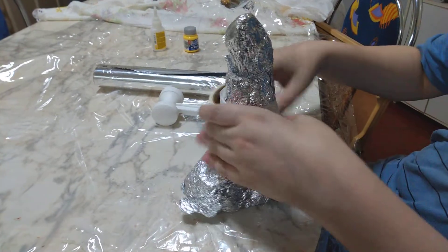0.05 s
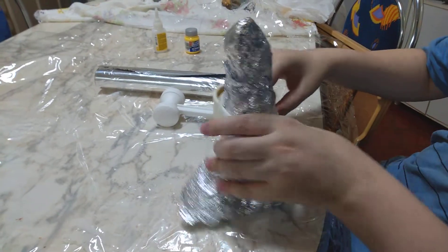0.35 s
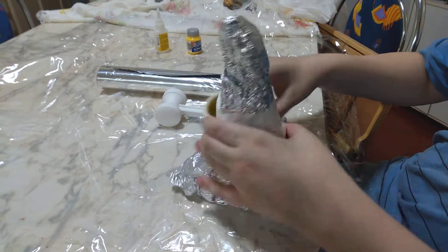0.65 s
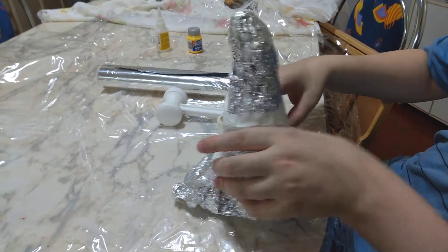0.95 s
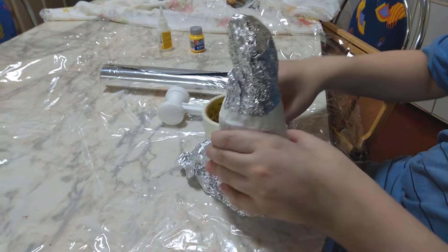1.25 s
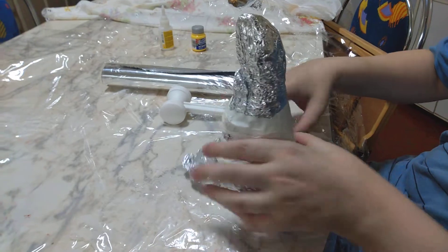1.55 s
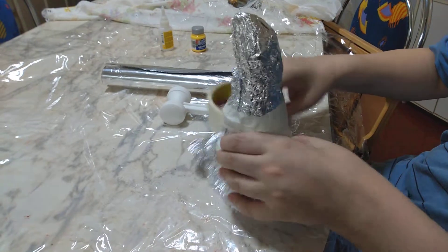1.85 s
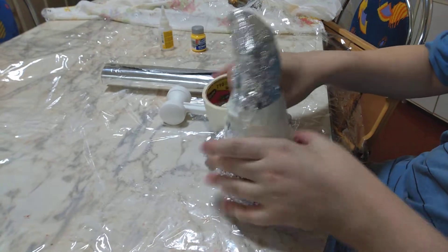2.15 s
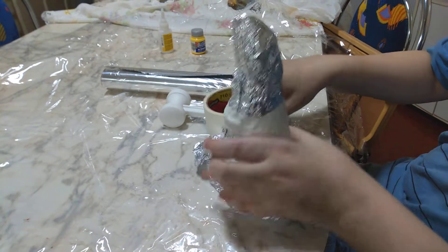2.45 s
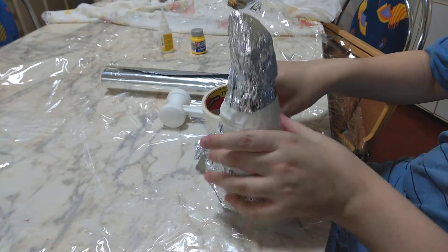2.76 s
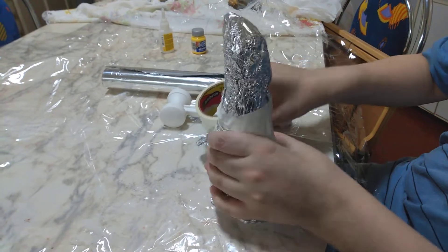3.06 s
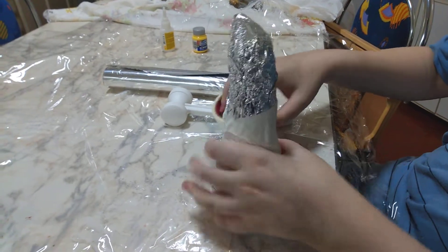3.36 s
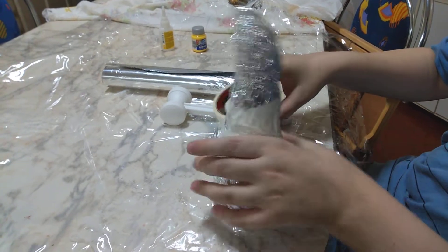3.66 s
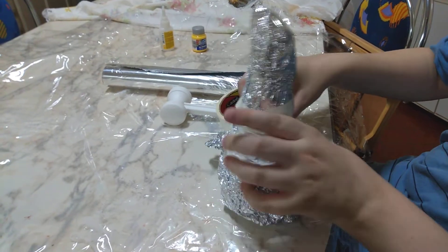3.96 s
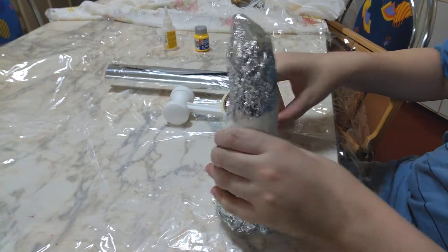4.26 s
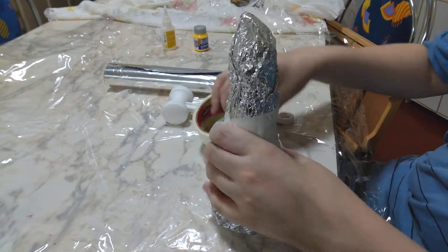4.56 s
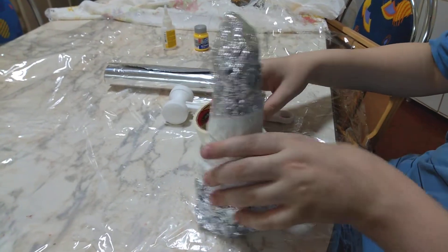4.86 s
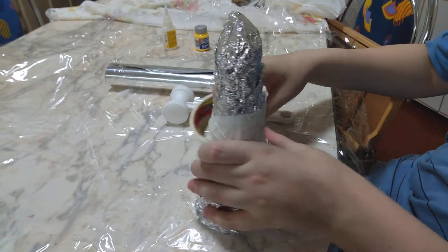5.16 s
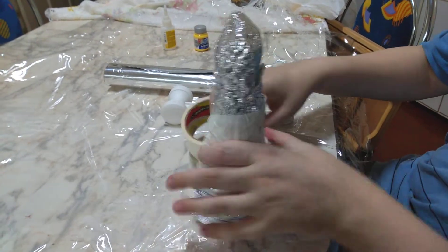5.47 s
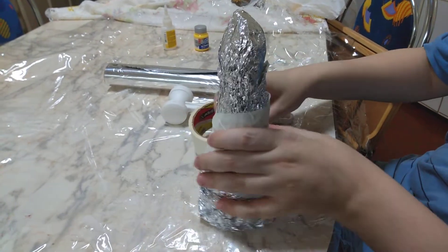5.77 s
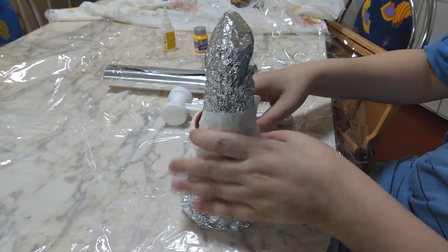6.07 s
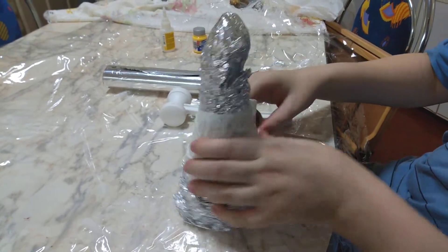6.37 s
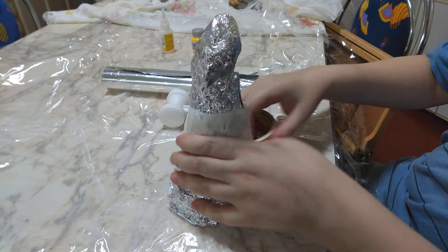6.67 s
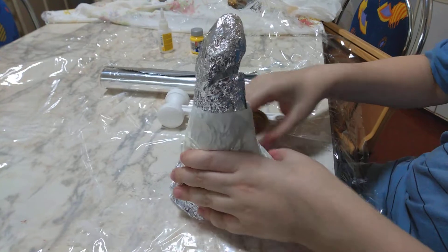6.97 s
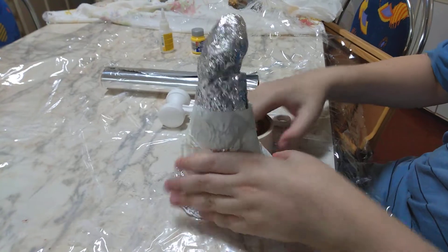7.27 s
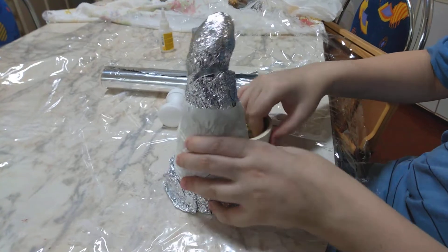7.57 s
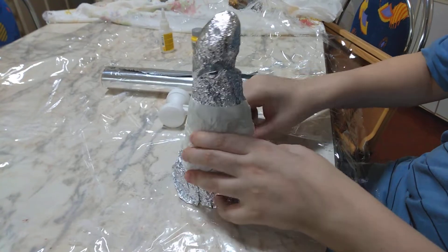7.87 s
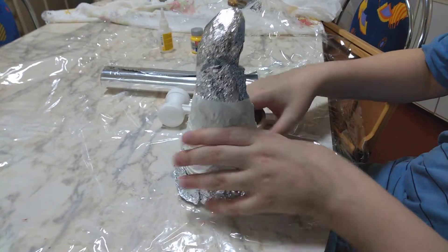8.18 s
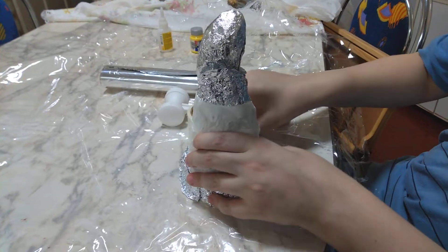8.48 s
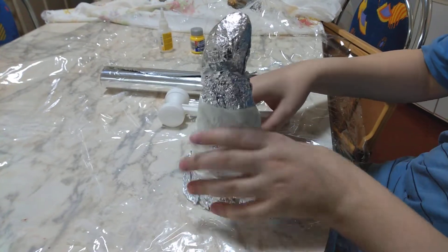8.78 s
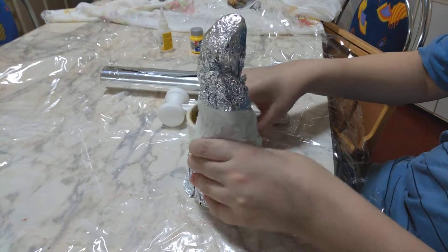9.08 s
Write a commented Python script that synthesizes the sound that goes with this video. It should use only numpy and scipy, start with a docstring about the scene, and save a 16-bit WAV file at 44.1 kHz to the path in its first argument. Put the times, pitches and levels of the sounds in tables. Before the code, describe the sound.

Short, rasping pulls of masking tape alternate with aluminium foil crackling and a few dull table knocks in a bare room.

```python
"""Taping a foil-covered form

A table in a bare room, a stereo microphone above it. Masking tape is tugged off its roll ten times and
wound round the form: the glue lets go in stick-slip jerks that ring the taut strip and the roll, while
its threads fizz. Between tugs fingers press the tape down, the foil buckles and ticks, and the form
bumps the table. The room rings on over a faint hush of air."""
import sys
import numpy as np
from scipy import signal
from scipy.fft import rfft, irfft, next_fast_len
from scipy.io import wavfile
from scipy.ndimage import uniform_filter1d

SR = 44100
rng = np.random.default_rng(int(sys.argv[2]) if len(sys.argv) > 2 else 0)


def master(y):
    """Save y as 16-bit WAV."""
    cut = np.clip(np.atleast_2d(y).T, -1, 1)
    pcm = np.round(cut * 32767)  # scale
    wavfile.write(sys.argv[1], SR, pcm.astype(np.int16))


N = 411451
T = np.arange(N) / SR
PATCH_HOLD_S, HAND_HOLD_S = .006, .012  # how long a patch of material, or a hand pose, shapes the sound


def amp(db):
    """Decibels to gain."""
    return 10 ** (np.asarray(db) / 20)


def along(points, hz):
    """Read (hz, value) points on a log-frequency axis."""
    point_hz, value = np.transpose(points)
    return np.interp(np.log(np.maximum(hz, 1)), np.log(point_hz), value)


def ring(x, response):
    """Pass x through an impulse response."""
    return signal.oaconvolve(x, response)[:N]


def colour(points, size=2048):
    """Causal response of unit energy with the given (hz, db) spectrum."""
    gain = amp(along(points, np.fft.rfftfreq(size, 1 / SR)))
    cepstrum = irfft(np.log(gain))
    cepstrum[1:size // 2] *= 2
    cepstrum[size // 2 + 1:] = 0
    response = irfft(np.exp(rfft(cepstrum)))
    return response / np.linalg.norm(response)


def resonator(modes, skirt_hz, size=1024):
    """Damped modes of unit total energy; neighbours swing in opposite senses, so the ring swells."""
    t = T[:size]
    response = sum((-1) ** k * amp(db) * width * np.exp(-np.pi * width * t) * np.cos(2 * np.pi * hz * t)
                   for k, (hz, width, db) in enumerate(modes))
    # soft tape and padding damp what lies above the modes
    response = signal.sosfilt(signal.butter(2, skirt_hz, fs=SR, output="sos"), response)
    return response / np.linalg.norm(response)


def crackle(per_s, spread_db, even_s):
    """Random snaps of very unequal size, evened towards rms 1 over stretches of even_s."""
    fires = rng.random(N) < per_s / SR
    snaps = fires * amp(spread_db * np.minimum(rng.exponential(size=N), 5)) * rng.choice([-1, 1], N)
    width = int(even_s * SR)
    power = np.abs(uniform_filter1d(uniform_filter1d(snaps ** 2, width), width))
    return snaps / np.sqrt(power + .1 / SR)


def clumps(per_s, spread_db):
    """Gain of mean power 1 that jumps to a new random level about per_s times a second."""
    step = np.cumsum(rng.random(N) < per_s / SR)
    gain = amp(spread_db * np.clip(rng.standard_normal(N), -2, 1.5))[step]
    return gain / np.sqrt(uniform_filter1d(gain ** 2, SR // 25))


def scatter(x, decay_s, hold_s, size=512):
    """Smear x with a short random response that is renewed every hold_s, keeping its energy."""
    hop = int(hold_s * SR)
    frames = np.lib.stride_tricks.sliding_window_view(np.pad(x, (hop, 2 * hop)), 2 * hop)[::hop]
    window = np.sin(np.pi * np.arange(2 * hop) / (2 * hop))
    responses = rng.standard_normal((len(frames), size)) * np.exp(-T[:size] / decay_s)
    responses /= np.linalg.norm(responses, axis=1, keepdims=True)
    out = np.zeros(N + 4 * hop + size)
    for k, piece in enumerate(signal.fftconvolve(frames * window, responses, axes=1)):
        out[k * hop:k * hop + len(piece)] += piece
    return out[hop:hop + N]


def snap(response, after_db, decay_s, size=400):
    """One clean break and the brief run of smaller breaks that it sets off, ringing a response."""
    breaks = rng.standard_normal(size) * np.exp(-T[:size] / decay_s)
    breaks *= amp(after_db) / np.linalg.norm(breaks)
    breaks[0] = 1
    return np.convolve(response, breaks)


def place(events, sound):
    """Place sound(other columns) at each row of start_s, peak_db, other columns."""
    out = np.zeros(N + SR)
    for start_s, peak_db, *rest in events:
        event, start = sound(*rest), max(int(start_s * SR), 0)
        out[start:start + len(event)] += amp(peak_db) * event / np.abs(event).max()
    return out[:N]


def ports(shared, apart, alike_hz):
    """The microphone's two close ports hear the same bass but unrelated treble."""
    hz = np.fft.rfftfreq(len(shared), 1 / SR)
    likeness = 1 / (1 + (hz / alike_hz) ** 2)
    mid = rfft(shared) * np.sqrt((1 + likeness) / 2)
    side = rfft(apart) * np.sqrt((1 - likeness) / 2)
    return irfft(np.array([mid + side, mid - side]), len(shared))


# Room tone at the microphone: frequency_hz, level_db
AIR_SPECTRUM = [(15, -33), (25, -1), (76, 5), (641, -25.5), (962, -7), (1480, -12), (2350, -14),
                (5140, -25.5), (8590, -27.5), (12200, -19), (16000, -20.5)]

def room_air():
    """The steady low hush of the room's air, at rms 1."""
    hush = ring(rng.standard_normal(N), colour(AIR_SPECTRUM))
    return hush / np.sqrt(np.mean(hush ** 2))


def press(length_s, build_share=.2, sag_db_per_s=14.5, release_s=.02):
    """Gain of one finger press: it builds, eases as the foil gives way, and lets go."""
    t = T[:SR // 2]
    build = np.minimum(t / (build_share * length_s), 1)
    release = np.exp(-np.maximum(t - length_s, 0) / release_s)
    return build * amp(-sag_db_per_s * t) * release


# Fingers pressing the tape onto the form: start_s, length_s, crumple_db, sizzle_db
PRESSES = [(0.0, 0.044, -45, -53.5), (0.237, 0.11, -58.5, -61), (0.408, 0.05, -37.5, -50),
           (0.549, 0.068, -39, -40), (0.644, 0.11, -46, -51.5), (0.944, 0.11, -50.5, -61.5),
           (1.052, 0.11, -47.5, -56.5), (1.424, 0.09, -48, -56), (1.542, 0.062, -55.5, -65),
           (1.646, 0.092, -53, -57), (1.712, 0.27, -48.5, -51), (2.06, 0.11, -52, -60),
           (2.347, 0.073, -56.5, -63), (2.425, 0.15, -49, -56.5), (2.62, 0.079, -49.5, -52.5),
           (2.84, 0.15, -56.5, -64), (3.058, 0.13, -44.5, -47), (3.328, 0.045, -52, -66),
           (3.521, 0.2, -59.5, -65.5), (3.887, 0.03, -59, -61), (4.136, 0.2, -54.5, -61),
           (4.248, 0.03, -39.5, -42), (4.328, 0.086, -42, -46.5), (4.522, 0.18, -46.5, -53),
           (4.728, 0.12, -63.5, -64), (4.988, 0.04, -45.5, -55.5), (5.135, 0.16, -45.5, -52.5),
           (5.371, 0.16, -51, -56.5), (5.623, 0.062, -56.5, -64), (5.806, 0.15, -59, -61),
           (6.03, 0.15, -61, -67.5), (6.266, 0.23, -56, -61.5), (6.708, 0.04, -52.5, -57),
           (6.762, 0.03, -44.5, -52.5), (6.855, 0.045, -59, -65), (6.922, 0.032, -43.5, -47),
           (7.078, 0.1, -43.5, -61), (7.219, 0.053, -47.5, -51.5), (7.405, 0.21, -55.5, -65),
           (7.598, 0.35, -41, -50.5), (7.928, 0.11, -48.5, -64.5), (8.228, 0.061, -50, -56.5),
           (8.525, 0.13, -48.5, -55.5), (8.832, 0.12, -49.5, -60.5), (9.233, 0.16, -52, -62)]

def fingers(rest_db=-79):
    """Gains of the shell's crumple and the foil's sizzle; resting fingers still stir both faintly."""
    start_s, length_s, crumple_db, sizzle_db = np.transpose(PRESSES)
    crumple = amp(rest_db) + place(zip(start_s, crumple_db, length_s), press)
    sizzle = amp(rest_db) + place(zip(start_s, sizzle_db, length_s), press)
    return crumple, sizzle


# Tone of the taped foil shell and of a bare crease: frequency_hz, level_db
SHELL_SPECTRUM = [(80, -15), (150, -10), (400, -9), (620, -11.5), (850, 3), (1150, 1.5), (1600, -3.5),
                  (2300, -2.5), (3000, -11), (3800, -9.5), (5000, -24.5), (9000, -24.5), (16000, -38.5)]
CREASE_SPECTRUM = [(1500, -11), (3500, -12.5), (6000, -9.5), (8000, -8), (10000, -5), (12500, 2),
                   (16000, -2.5)]
# The loudest folds snapping through, below the microphone: start_s, shell_db, crease_db
FOLD_SNAPS = [(0.2317, -38, -34.5), (0.2942, -46, -36), (0.356, -31, -28), (0.3733, -23, -26),
              (0.4334, -31, -37), (0.5838, -34, -20), (0.593, -27, -16), (0.613, -24, -33),
              (0.643, -17, -31), (1.053, -27, -32), (1.505, -25, -22.5), (1.7407, -26, -28),
              (2.125, -36.5, -48), (2.1761, -37, -34), (2.363, -33.5, -38), (2.4364, -40, -21.5),
              (2.47, -27.5, -32), (2.5528, -33, -31), (2.6493, -44, -30), (2.779, -46, -40),
              (2.9316, -32.5, -28.5), (3.0925, -44, -23.5), (3.123, -34, -18), (3.139, -37, -19),
              (3.1776, -49, -26), (3.1892, -40, -13.5), (3.601, -40.5, -48), (3.635, -43, -48),
              (3.846, -36, -46), (3.894, -48, -35.5), (4.1469, -36.5, -28), (4.257, -29.5, -32),
              (4.388, -36, -22), (4.579, -30.5, -44), (4.673, -38, -44), (4.692, -31.5, -42),
              (4.828, -36, -39), (5.003, -36.5, -45), (5.0927, -50, -37), (5.429, -37, -48),
              (5.4514, -30.5, -31), (5.547, -37, -46), (5.6304, -59, -35), (5.9416, -51, -42),
              (6.173, -41, -48), (6.3255, -35.5, -34.5), (6.4324, -44, -33.5), (6.563, -51, -38.5),
              (6.708, -38.5, -37), (6.779, -32.5, -42), (7.2495, -42, -26), (7.515, -40, -49),
              (7.567, -31, -28), (7.609, -29.5, -27), (7.651, -29, -24), (7.8044, -29, -7.5),
              (7.9929, -31, -30.5), (8.06, -36.5, -35), (8.266, -30, -51), (8.287, -33.5, -33),
              (8.625, -32.5, -34), (8.668, -27.5, -38), (8.8915, -33.5, -33)]

def foil():
    """Under the fingers the taped shell crumples dully and bare creases tick brightly."""
    crumple, sizzle = fingers()
    shell, crease = colour(SHELL_SPECTRUM), colour(CREASE_SPECTRUM)
    # a light touch gives single snaps; harder pressure buckles so many folds that they merge into a rub
    pressure = np.clip(crumple / amp(-56), .4, 8)
    avalanches = clumps(per_s=150, spread_db=2.5)
    folds = avalanches * crackle(per_s=450 * pressure, spread_db=4.5, even_s=0.011)
    wrinkles = crackle(per_s=120 * pressure, spread_db=8.5, even_s=0.021)
    dull = ring(scatter(folds * crumple, decay_s=0.0011, hold_s=PATCH_HOLD_S), shell)
    bright = ring(sizzle * (amp(-1.5) * folds + amp(1.5) * wrinkles), crease)
    start_s, shell_db, crease_db = np.transpose(FOLD_SNAPS)
    buckles = place(zip(start_s, shell_db), lambda: snap(shell, after_db=0.5, decay_s=.0018))
    ticks = place(zip(start_s, crease_db), lambda: snap(crease, after_db=2.5, decay_s=0.00064))
    return amp(-2.5) * dull + bright + amp(0.5) * buckles + amp(4.5) * ticks


def drag(length_s, rise_s=0.052, settle_s=0.089):
    """Gain of the form sliding under one tug and settling after it."""
    t = T[:SR]
    return np.minimum(t / rise_s, 1) * np.exp(-np.maximum(t - length_s, 0) / settle_s)


# Tone of the table top under the sliding form: frequency_hz, level_db
TABLE_SPECTRUM = [(20, -31), (35, -24.5), (50, 3.5), (70, 0), (110, -2), (200, -7), (320, -16), (700, -21),
                  (2000, -66)]

def table_shuffle(rock_db=-12.5, tremble_db=-66):
    """Tugs drag the form, pressing fingers rock it, and the hands never hold it quite still."""
    start_s, length_s, *_, drag_db = np.transpose(TUGS)
    crumple, _ = fingers()
    motion = place(zip(start_s, drag_db, length_s), drag) + amp(rock_db) * crumple + amp(tremble_db)
    friction = crackle(per_s=300, spread_db=2, even_s=0.053)
    return ring(friction * motion, colour(TABLE_SPECTRUM))


# Form and roll knocking on the table: start_s, level_db, pitch_hz
BUMPS = [(0.019, -42.5, 67.3), (0.358, -49, 234), (1.495, -43, 137), (1.677, -41.5, 89), (1.814, -41, 304),
         (2.351, -44, 137), (3.833, -55, 104), (4.256, -49.5, 398), (4.561, -40.5, 218),
         (5.003, -50.5, 172), (5.249, -44, 227), (5.651, -50.5, 127), (6.305, -50, 91), (6.956, -39.5, 395),
         (7.745, -34.5, 284), (8.232, -43, 119), (8.371, -45, 135), (8.846, -51, 250), (8.984, -42.5, 209)]

def table_bumps(width_hz=32):
    """Each padded blow rings one low mode and a weaker, shorter one above it."""
    def thud(pitch_hz):
        modes = [(pitch_hz, width_hz, 0), (2.5 * pitch_hz, 2 * width_hz, -14)]
        return resonator(modes, skirt_hz=450, size=4096)
    return place(BUMPS, thud)


def tug(length_s, swell_db, coast_s, coast_db, grip_s=.005, slacken_s=0.01, stop_db_per_s=892.5):
    """Gain of one tug: it grips, moves by swell_db, drops by coast_db while the roll runs on, and dies."""
    t = T[:SR // 2]
    swell = -swell_db * np.clip(1 - t / length_s, 1e-6, 1) ** 1.63
    slack = coast_db * np.clip((t - length_s) / slacken_s, 0, 1)
    stop = -stop_db_per_s * np.maximum(t - length_s - coast_s, 0)
    return np.minimum(t / grip_s, 1) * amp(swell + slack + stop)


# The hardest slips at the peel line: start_s, level_db
HARD_SLIPS = [(0.479, -19.5), (0.49, -17), (0.503, -12.5), (0.513, -9.5), (1.144, -22.5), (1.189, -13),
              (1.229, -10.5), (1.249, -8.5), (1.828, -22), (1.883, -11.5), (1.906, -16), (4.419, -20),
              (5.257, -22), (6.958, -25), (7.751, -14), (7.759, -16), (7.765, -10.5), (8.382, -24),
              (9.075, -15.5), (9.096, -15)]

def glue_jerks(effort, slips_per_s=110):
    """A hard slip frees a whole line of glue at once; lesser ones follow as the strain builds again."""
    hard = place(HARD_SLIPS, lambda: snap([1], after_db=-4.5, decay_s=0.001))
    strain = np.cumsum(slips_per_s * clumps(per_s=100, spread_db=4)) / SR
    gives_way = np.diff(np.floor(strain), prepend=0)
    lesser = gives_way * effort * amp(6.5 + 2 * rng.standard_normal(N))
    return amp(-4) * hard + ring(lesser, snap([1], after_db=-4, decay_s=.002))


# Modes of the tape-laden roll, the taut strip and the hollow core: pitch_hz, width_hz, level_db
ROLL_MODES = [(766, 115, -6.5), (909, 190, 2), (1287, 532, -0.5), (1463, 134, 0.5), (1760, 200, -11.5)]
STRIP_MODES = [(2112, 305, 31.5), (2600, 240, -7), (3100, 200, -20), (3650, 890, -10)]
CORE_MODES = [(143, 140, -10.5), (227, 44, 1), (334, 140, -1.5), (467, 105, 3.5)]
# Tone of the breaking glue threads: frequency_hz, level_db
FIZZ_SPECTRUM = [(2500, -28.5), (4000, -5), (5000, -11.5), (6200, -14), (7500, -8.5), (9500, -10.5),
                 (11500, -1.5), (13000, 1.5), (16000, -5.5)]
# Tugs on the tape, the last two in two pulls each; strip, fizz and core are relative to the peel:
# start_s, length_s, level_db, swell_db, coast_s, strip_db, fizz_db, core_db, drag_db
TUGS = [(0.462, 0.042, -22, 15, 0.027, -12, -7.5, -14, -47),
        (1.127, 0.12, -23, 10, 0.037, -10, -8.5, -10.5, -47),
        (1.81, 0.1, -21, 17, 0.049, -9.5, -5, -10, -41.5),
        (2.973, 0.045, -31, 17.5, 0.011, -2.5, 0.5, -10, -56),
        (4.399, 0.041, -24, 10.5, 0.0063, -5, -2, -21.5, -56),
        (5.232, 0.048, -29.5, 14, 0.008, -2, -2.5, -13, -58),
        (6.95, 0.091, -31.5, 0, 0.0093, -5, -2.5, -9.5, -57),
        (7.712, 0.051, -19, 9.5, 0.035, -1, -6.5, -18.5, -45),
        (8.317, 0.059, -35, -5.5, 0.0043, -3, -6.5, -10.5, -58.5),
        (8.375, 0.069, -29.5, 2, 0.01, -4.5, -3, -11, -55),
        (8.978, 0.041, -34.5, -0.5, 0.012, -2.5, -10, -15, -70),
        (9.031, 0.074, -28.5, 9.5, 0.01, -2.5, -9, -10, -52)]

def tape():
    """Stick-slip at the peel line rings roll, strip and core; the breaking glue threads fizz."""
    start_s, length_s, level_db, swell_db, coast_s, strip_db, fizz_db, core_db, _ = np.transpose(TUGS)
    current_tug = np.maximum(np.searchsorted(start_s, T) - 1, 0)
    taut, fizz, hollow = (amp(db)[current_tug] for db in (strip_db, fizz_db, core_db))
    tugs = list(zip(start_s, level_db, length_s, swell_db, coast_s))
    effort = place(tugs, lambda *shape: tug(*shape, coast_db=-12.5))
    unwinding = place(tugs, lambda *shape: tug(*shape, coast_db=-2.5))
    roll = resonator(ROLL_MODES, skirt_hz=3670)
    strip = resonator(STRIP_MODES, skirt_hz=4200)
    core = resonator(CORE_MODES, skirt_hz=930)
    spurts = clumps(per_s=450, spread_db=3.5)  # the glue holds and gives by turns
    jerks = glue_jerks(effort) / np.abs(roll).max()
    grain = crackle(per_s=1500, spread_db=2.5, even_s=0.004)
    slips = amp(-4.5) * effort * spurts * scatter(grain, decay_s=0.00016, hold_s=PATCH_HOLD_S)
    force = slips + jerks
    # the tighter the strip is pulled, the more of the force goes into it and the less into the roll
    slack = np.sqrt(np.clip(1 - taut ** 2, .12, 1))
    body = ring(force * slack, roll) + amp(-1.5) * ring(force * taut, strip)
    body += amp(-4) * ring(force * hollow, core)
    threads = unwinding * spurts * crackle(per_s=6600, spread_db=3.5, even_s=0.0049)
    tearing = amp(0.5) * threads + amp(-14) * slips + amp(-6.5) * jerks
    return body + ring(fizz * tearing, colour(FIZZ_SPECTRUM))


# Reverberation of the bare room: frequency_hz, t60_s
ROOM_DECAY = [(100, 0.22), (260, 0.61), (700, 0.54), (1840, 0.43), (4850, 0.47), (12800, 0.31)]
# Strength of the room's echoes at the microphone: frequency_hz, level_db
ROOM_LEVEL = [(100, 0), (300, -2), (600, 3), (1100, -7), (2200, -5.5), (5000, -1.5), (13000, -7)]

def room_tail(onset_s=0.0049):
    """Diffuse echoes in half-octave bands, each with its own decay and level."""
    t, hz = T[:SR], np.fft.rfftfreq(SR, 1 / SR)
    noise, tail = rfft(rng.standard_normal(SR)), 0
    onset = 1 - np.exp(-(t / onset_s) ** 2)
    for centre_hz in 40 * 2 ** np.arange(0, 9.5, .5):
        band = np.clip(1 - 2 * np.abs(np.log2(np.maximum(hz, 1) / centre_hz)), 0, 1)
        fall = onset * np.exp(-np.log(1000) * t / along(ROOM_DECAY, centre_hz))
        tail += amp(along(ROOM_LEVEL, centre_hz)) * irfft(noise * band) * fall / np.linalg.norm(fall)
    return tail


def scene():
    """All reaches the microphone directly and by the room; tape and foil also glance off the hands."""
    work = tape() + foil()
    source = work + amp(-8) * table_shuffle() + amp(0.5) * table_bumps()
    # the work lies a little to the right, so the left port hears it one sample later
    direct = np.array([np.pad(source, (1, 0))[:N], source])
    off_hands = [scatter(work, decay_s=0.0036, hold_s=HAND_HOLD_S) for _ in range(2)]
    glancing = ports(*off_hands, alike_hz=1300)
    room = np.array([ring(source, tail) for tail in ports(room_tail(), room_tail(), alike_hz=684)])
    air = ports(room_air(), room_air(), alike_hz=593)
    return amp(-3) * direct + amp(-1.5) * glancing + room + amp(-63) * air


# Response of the microphone above the table: frequency_hz, gain_db
MIC_RESPONSE = [(20, -22), (35, -3), (55, 0.5), (150, 0), (220, 3), (310, 1.5), (420, 2.5), (620, -1),
                (800, -2.5), (1600, -1.5), (2300, 0.5), (3000, 1.5), (3700, 0.5), (5000, -1.5)]
# Balance of its two ports: frequency_hz, left_minus_right_db
PORT_BALANCE = [(200, 1.5), (480, -1.5), (720, 4), (1000, 2.5), (1500, -2.5), (2200, 0.5), (3300, -1),
                (4300, 0), (6000, -4), (9000, 0.5), (12500, -6), (16000, -4)]

def record(dry, top_hz=16000):
    """The microphone thins the deep bass and each port has its own colour; the top is cut steeply."""
    size = next_fast_len(N + SR // 10)
    hz = np.fft.rfftfreq(size, 1 / SR)
    port_db = along(MIC_RESPONSE, hz) + np.outer([1, -1], along(PORT_BALANCE, hz)) / 2
    heard = irfft(rfft(dry, size) * amp(port_db), size)[:, :N]
    return signal.sosfilt(signal.ellip(10, .2, 70, top_hz, fs=SR, output="sos"), heard)


dry = scene()
out = record(dry)
master(out)
```